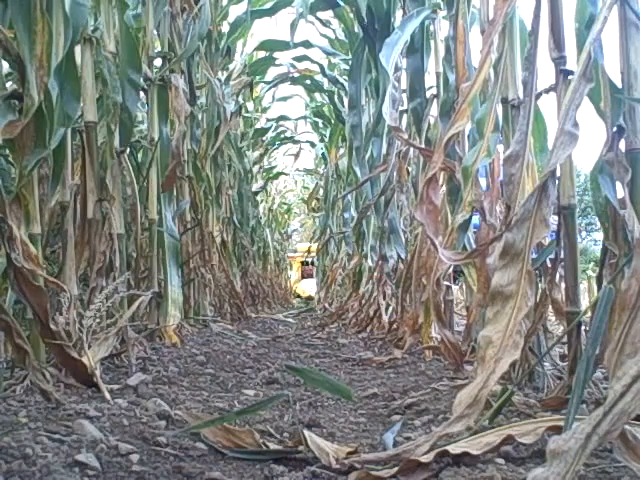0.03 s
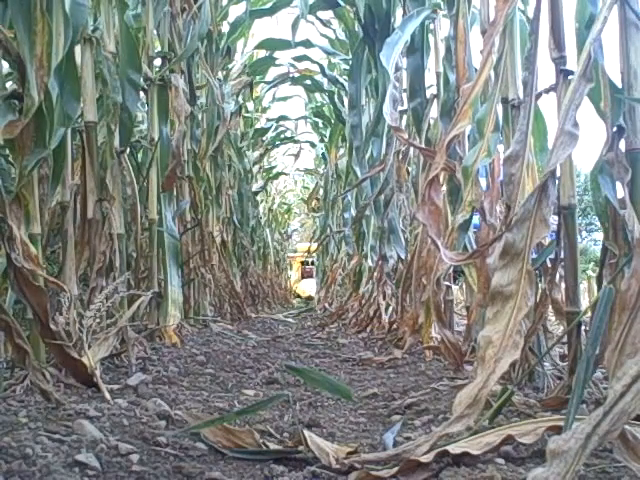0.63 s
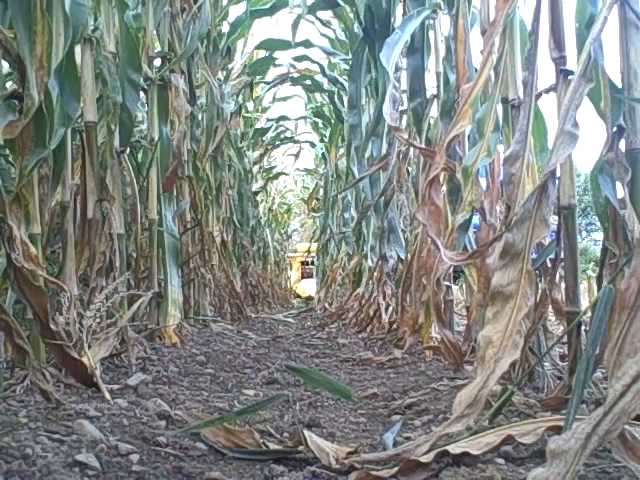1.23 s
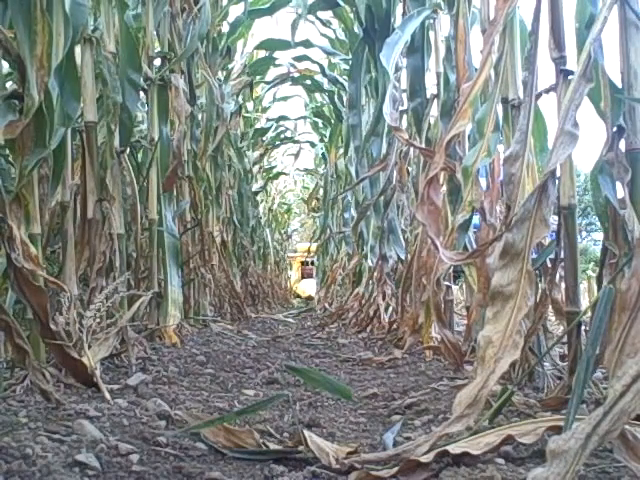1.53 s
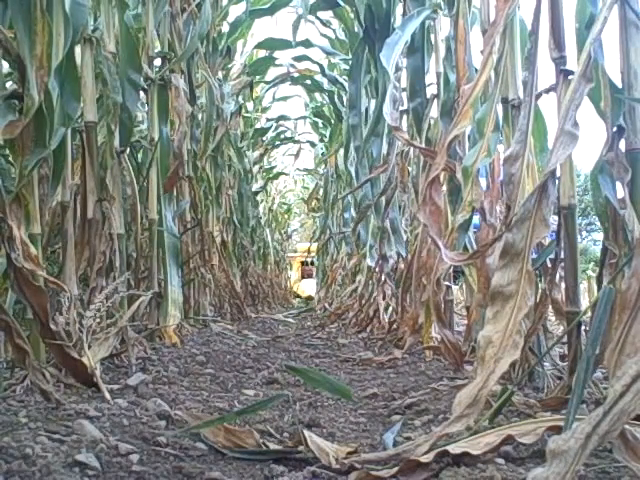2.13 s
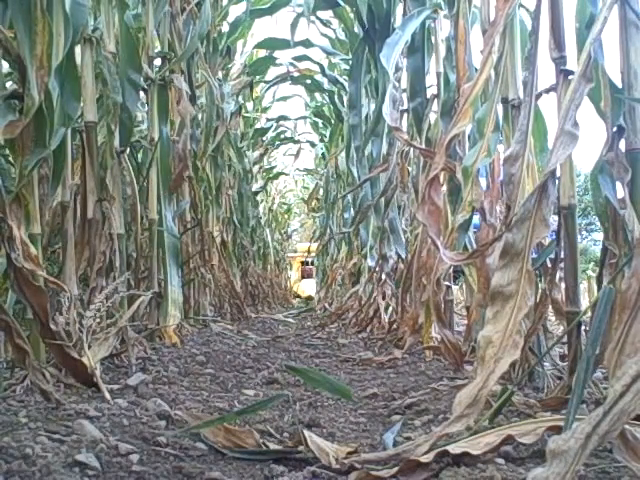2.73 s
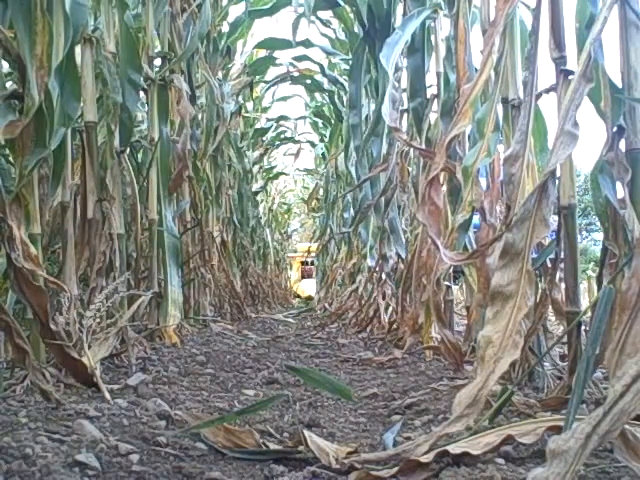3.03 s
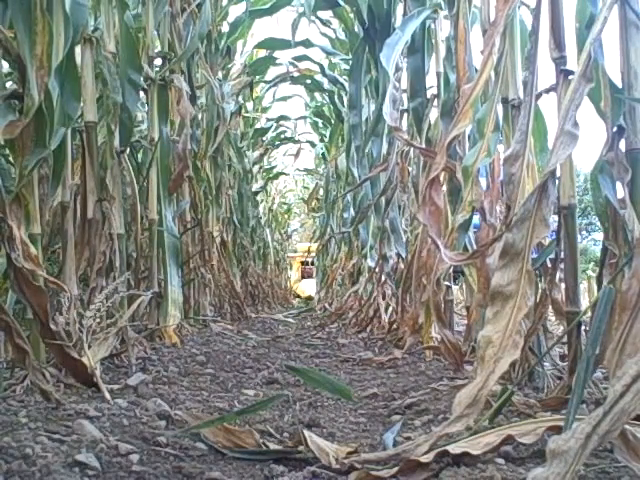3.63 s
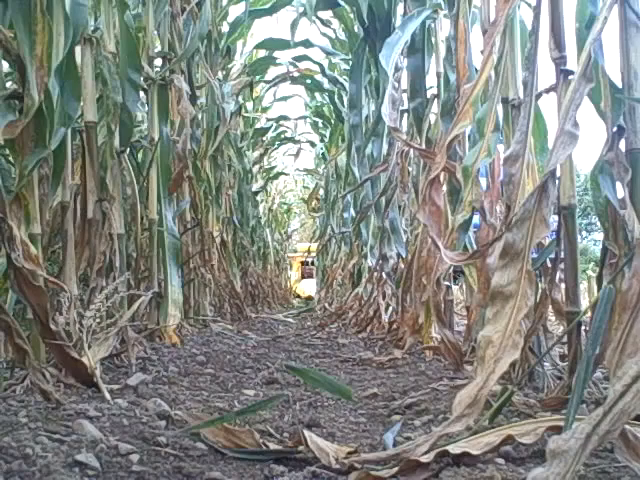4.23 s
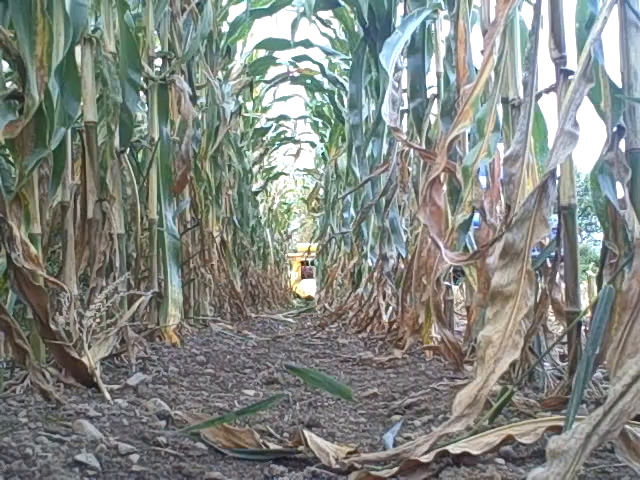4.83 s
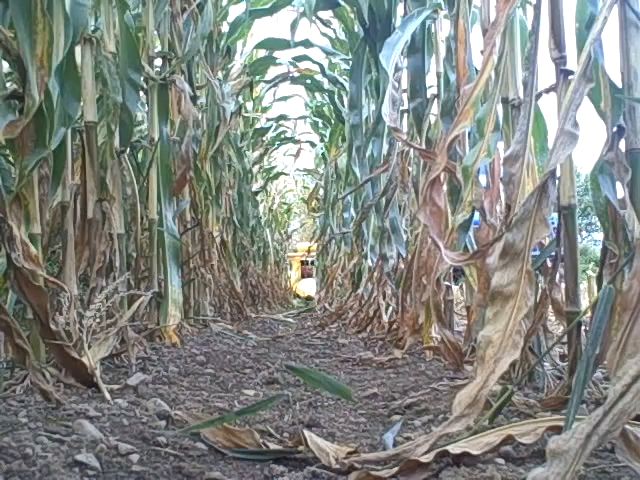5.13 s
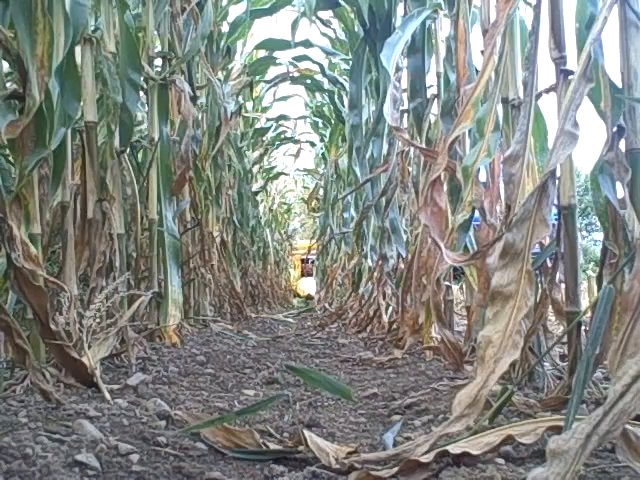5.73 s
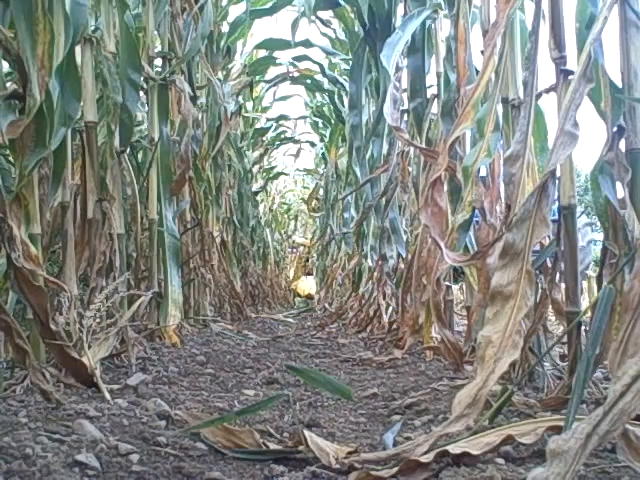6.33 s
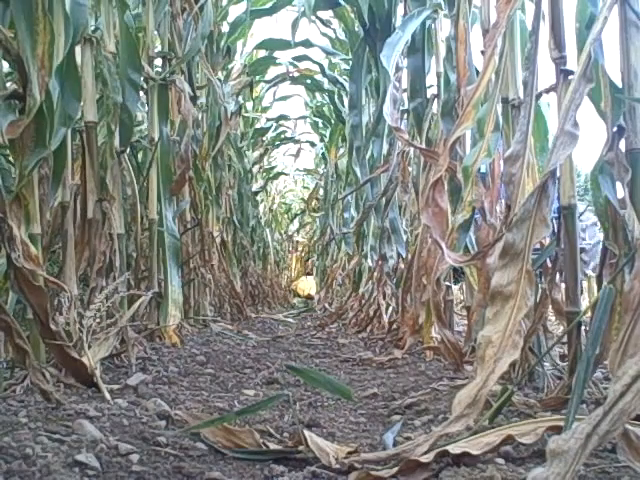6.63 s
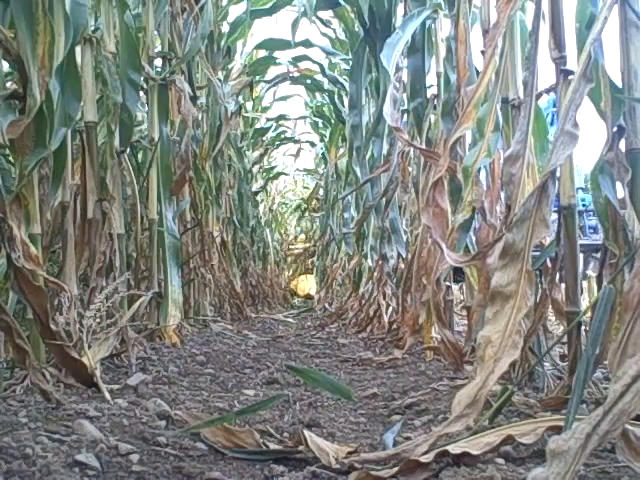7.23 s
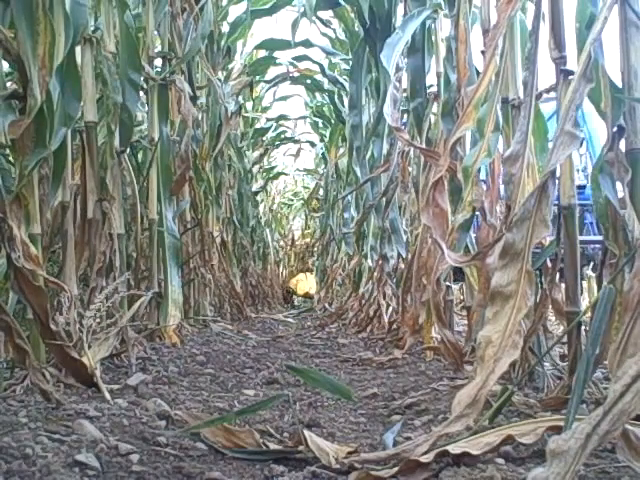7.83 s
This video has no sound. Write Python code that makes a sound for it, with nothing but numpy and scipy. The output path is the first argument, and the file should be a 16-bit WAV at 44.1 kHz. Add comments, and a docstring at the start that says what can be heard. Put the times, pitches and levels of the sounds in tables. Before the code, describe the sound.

A forage chopper and a tractor work through tall corn, heard from one fixed spot in the row. The diesel drones over a low rumble, with rapid metallic clanking, shifting gear whines and a fast, fluttering hiss of chopped stalks. The engine dips briefly, then sags deeper and growls under load. The machines close in and draw level at the end, brushing nearby leaves.

```python
"""A forage chopper's six-cylinder diesel drones under load, working down a row of tall corn with a
tractor alongside, heard from one microphone standing in the row. Each firing pulses the exhaust and
knocks the block, and a clank beats once a cycle; the cutter throws chopped stalks in hissing bursts,
twice a turn. The engine sags briefly near 3 s, then sags deeper and growls around 5 s. The machines
close in and draw level with the microphone at the end, brushing the nearest leaves."""
import sys
import numpy as np
from scipy import signal
from scipy.fft import rfft, irfft, next_fast_len
from scipy.io import wavfile
from scipy.ndimage import uniform_filter1d, map_coordinates

SR = 44100
rng = np.random.default_rng(int(sys.argv[2]) if len(sys.argv) > 2 else 0)


def to_wav(sig):
    """Store sig (one row per channel, or 1-D mono) as 16-bit WAV at the path in sys.argv[1].

    Samples outside -1..1 are clipped; the rate is SR.
    """
    pcm = np.clip(np.atleast_2d(sig), -1, 1) * 32767
    pcm = np.round(pcm).astype(np.int16)
    wavfile.write(sys.argv[1], SR, pcm.T)  # frames by channels


N = 347067
TIME_S = np.arange(N) / SR
APPROACH_S, APPROACH_LENGTH_S = 4.6, 2.1  # the machines close in on the microphone
ABREAST_S, ABREAST_LENGTH_S = 7.15, 0.74  # then swell quickly as they draw level
UNLOADED_FIRING_HZ = 99.4  # sag is how far the firing rate falls below this

# engine speed: t/s, firing rate/Hz
ENGINE_SPEED = [(0, 98.55), (.5, 98.95), (1.3, 98.65), (1.75, 98.45), (2.6, 98.5), (2.82, 96.35),
                (3.08, 97.35), (3.22, 96.85), (3.45, 98.25), (4.1, 98.15), (4.5, 97.6), (5.1, 95.2),
                (5.5, 94.95), (5.8, 95.75), (6.35, 96.2), (6.62, 96.85), (7.87, 96.65)]
# crop flow, as the level of its hiss: t/s, level/dB
CROP_FLOW = [(0.0, -35.5), (1.89, -36.5), (2.52, -38), (5.19, -38.5), (7.43, -36), (7.8, -34.5)]
# each part at the microphone: gain far off and unloaded/dB, change with sag/(dB per Hz),
# change on the approach/dB, change on drawing level/dB
PART_GAINS = { "drone": (-23.5, 0.72, 2, -0.5), "growl": (-13.5, 2, 3.5, -1),
              "frame": (-35.5, -0.98, -0.5, 4), "rumble": (-35, 0.04, 0, 4),
              "block": (-39.5, 0.8, 2.2, 3.5), "injectors": (-38, 0.1, 0.5, 2.5), "howl": (0.5, -3, -5, -4),
              "rush": (-36, -0.45, 1.5, 4), }

# noise spectra, all as f/Hz, relative level/dB
RUMBLE_SPECTRUM = [(20, -34), (35, -10), (50, -14), (70, -2.5), (130, -4.5), (190, -1), (260, -3),
                   (400, -6), (700, -11.5), (1500, -11), (3000, -26.5), (6000, -48)]  # both machines
RUSH_SPECTRUM = [(2800, -2), (3100, -3), (4200, -5.5), (4900, -2.5), (5900, -2), (7000, -3), (8500, -2),
                 (10200, -5.5), (12500, -7.5), (13100, -6), (13700, -8), (15700, -13)]  # steady high rush
LEAF_SPECTRUM = [(4500, -12), (6300, 0), (7600, -1), (10000, -9)]  # brushed leaves
CHOP_SPECTRUM = [(3000, -15), (5000, -8), (6000, 2), (7500, 0), (8500, 5), (9300, 3), (10500, 3),
                 (12500, 2), (13800, 2.5), (15700, -7)]  # flying pieces of stalk
SPOUT_SPECTRUM = [(4300, -26), (4480, -5), (4560, 4), (4800, -25)]  # thin metallic ring of the spout
FRAME_SPECTRUM = [(250, 9.5), (340, -7), (430, 5), (500, -1), (570, -3), (660, 4.5), (760, 1), (900, 0.5),
                  (1050, 3), (1300, -2)]  # low clatter of the frame
BLOCK_SPECTRUM = [(800, -0.5), (1000, -3), (1120, 4), (1220, -4), (1350, 6.5), (1430, 5), (1530, 4),
                  (1680, 2), (1850, -2), (2100, 3)]  # ring of the engine block
INJECTOR_SPECTRUM = [(1600, -9), (1900, 3), (2150, -12), (2310, 4.5), (2430, -5.5), (2620, 3), (2800, -4),
                     (3200, -9.5), (4500, -14.5)]  # bright tick of the injectors
# hiss of coarse to fine pieces: low f/Hz, high f/Hz
PIECE_BANDS = [(3000, 7000), (7000, 10500), (10500, 16000)]

# engine tones, all as order (multiple of the cycle rate), level/dB before any gain
HUM_ORDERS = [(3, -48.5), (4, -53), (5, -73), (7, -47), (8, -50.5), (9, -54), (10, -43.5), (10.41, -40.5),
              (12, -34.5), (14, -41.5), (15, -50.5), (16, -46), (18, -50.5), (20, -49), (20.82, -47),
              (21, -47.5), (22, -50), (30, -78), (31.23, -64)]  # exhaust and drive; fractional orders are geared shafts
EXHAUST_GROWL_ORDERS = [(14, -46), (18, -39), (24, -52), (30, -46), (38, -50), (39, -50), (40, -45.5),
                        (41, -52)]  # labouring exhaust
BLOCK_HOWL_ORDERS = [(30, -49), (31.23, -50), (39, -50), (42, -49), (44, -49), (54, -50), (141, -49),
                     (154, -53), (160, -51)]  # howl of the block
# gear whines: start t/s, end t/s, order, relative level/dB
GEAR_WHINES = [(-.2, 2.7, 66, -49), (-.2, 2.7, 82, -47), (-.2, 2.7, 93, -46), (2.6, 8.1, 84, -48),
               (3.0, 4.7, 72, -45), (3.3, 4.6, 90, -46), (4.2, 4.85, 160, -48), (4.3, 5.0, 108, -49),
               (4.6, 4.95, 110.6, -47), (4.95, 6.2, 72, -45), (4.95, 6.2, 70, -46), (6.1, 7.5, 66, -46),
               (6.3, 8.1, 93, -47), (6.5, 7.8, 72, -48), (6.5, 7.8, 70, -48), (6.5, 8.1, 108, -46),
               (6.55, 7.6, 110.6, -46), (6.6, 8.1, 144, -49), (6.6, 7.7, 153, -49), (7.5, 8.1, 31.23, -41)]
# knock of each cylinder in firing order: relative level/dB
CYLINDER_KNOCKS = [-12.5, -26, -14.5, -36, -8, -9]
# one heavy clank among lighter ones: place/cycle, start f/Hz, end f/Hz, length/s, relative level/dB
CLANK_PATTERN = [(.07, 1720, 1400, .007, -7), (.09, 2650, 2300, .008, -7), (.115, 1310, 1060, .014, 0),
                 (.22, 2000, 1650, .009, -11), (.31, 1060, 720, .013, -6), (.44, 1350, 1200, .007, -2.5),
                 (.45, 2400, 1900, .013, -9), (.5, 2740, 2520, .008, -6), (.56, 1170, 1080, .009, -8),
                 (.68, 1650, 1430, .015, -7), (.69, 2720, 2300, .015, -9), (.76, 1160, 1260, .008, -9),
                 (.91, 1150, 950, .009, -7.5)]
# the clanking, dipping where the engine labours: t/s, level/dB
CLANK_LEVEL = [(0, -28.5), (1.0, -29.5), (1.5, -27.5), (2.6, -27), (2.85, -34), (3.2, -31), (3.5, -27),
               (4.3, -27), (4.7, -32), (5.0, -42), (6.3, -41), (6.7, -35), (7.87, -35)]


def from_db(db):
    """Decibels to amplitude."""
    return 10 ** (np.asarray(db) / 20)


def rms_one(x):
    """Scale a sound to rms 1."""
    return x / np.sqrt(np.mean(x ** 2) + 1e-20)


def curve(rows):
    """A (t/s, value) table at every sample."""
    return np.interp(TIME_S, *np.transpose(rows))


def ramp(start_s, length_s):
    """A straight rise from 0 to 1, then held."""
    return np.clip((TIME_S - start_s) / length_s, 0, 1)


def drift(rate_hz):
    """Smooth random wander of rms 1, mostly slower than rate_hz."""
    hop, settle = 100, 2000
    pole = np.exp(-2 * np.pi * hop * rate_hz / SR)
    noise = rng.standard_normal(N // hop + settle + 2)
    slow = signal.lfilter([1], [1, -2 * pole, pole * pole], noise)[settle:]
    return np.interp(np.arange(N) / hop, np.arange(len(slow)), rms_one(slow))


def tail(x, decay_s):
    """Give each impulse an exponential decay."""
    return signal.lfilter([1], [1, -np.exp(-1 / (decay_s * SR))], x + 1e-18)


def colour(x, spectrum):
    """Shape a sound by a spectrum that falls away steeply past its ends; rms 1."""
    size = next_fast_len(N)
    log_hz = np.log(np.maximum(np.arange(size // 2 + 1) * SR / size, 1))
    hz, level_db = np.transpose(spectrum)
    outside = np.abs(log_hz - np.clip(log_hz, np.log(hz[0]), np.log(hz[-1])))
    gain = from_db(np.interp(log_hz, np.log(hz), level_db) - 40 * outside)
    return rms_one(irfft(rfft(x, size) * gain, size)[:N])


def tones(cycles, orders, waver_db, wander_turns):
    """Wavering engine orders; the lower ones come later, so each cycle sweeps downward."""
    out = np.zeros(N)
    for order, level_db in orders:
        sweep_turns = .009 * order ** 2
        turns = order * cycles + sweep_turns + wander_turns * drift(1)
        out += from_db(level_db + waver_db * drift(0.67)) * np.sin(2 * np.pi * turns)
    return np.sqrt(2) * out


def mic_gain(part, sag_hz):
    """Gain of a part at the microphone, from engine sag and the distance of the machines."""
    far_db, db_per_hz, approach_db, abreast_db = PART_GAINS[part]
    near_db = approach_db * ramp(APPROACH_S, APPROACH_LENGTH_S)
    near_db += abreast_db * ramp(ABREAST_S, ABREAST_LENGTH_S)
    return from_db(far_db + db_per_hz * sag_hz + near_db)


def rumble(sag_hz):
    """Chopper and tractor lay a low bed of noise under everything."""
    return mic_gain("rumble", sag_hz) * colour(rng.standard_normal(N), RUMBLE_SPECTRUM)


def rush(sag_hz, flow_db):
    """A steady high rush follows about a fifth of the crop flow's swing in dB."""
    swing = from_db(0.21 * (flow_db - flow_db.mean()))
    return mic_gain("rush", sag_hz) * swing * colour(rng.standard_normal(N), RUSH_SPECTRUM)


def leaves():
    """A fluttering swish rises as the machines brush the plants nearest the microphone."""
    swell = ramp(ABREAST_S, ABREAST_LENGTH_S) ** 2
    return swell * from_db(-42 + 2.5 * drift(40)) * colour(rng.standard_normal(N), LEAF_SPECTRUM)


def stalks(flow_db, per_s=220):
    """Stray pieces patter against the spout at random."""
    ticks = (rng.random(N) < per_s / SR) * from_db(rng.random(N))
    patter = uniform_filter1d(tail(ticks, decay_s=.00058), size=60)
    return from_db(flow_db - 6.5) * colour(patter * rng.standard_normal(N), CHOP_SPECTRUM)


def cutter(cycles, flow_db, chops_per_cycle=2.63, scatter_s=.0017, uneven_db=3.4, weak_db=-7):
    """Two sprays of stalk a turn, one strong and one weak, uneven in size and timing."""
    chops = cycles * chops_per_cycle
    number = np.arange(int(chops[-1]))
    lateness, size = rng.standard_normal((len(number), 2)).T
    due = np.interp(number + 0.596, chops, np.arange(N))  # a spray leaves partway between chops
    at = np.clip((due + scatter_s * SR * lateness).astype(int), 0, N - 1)
    throws = np.zeros(N)
    throws[at] = from_db(uneven_db * np.tanh(size) + weak_db * (number % 2))
    bursts = tail(tail(throws, .001), .0045)  # quick rise, slower fall
    pieces = np.zeros(N)
    for band in PIECE_BANDS:  # changing shares of coarse and fine colour each spray
        bandpass = signal.butter(2, band, "band", fs=SR, output="sos")
        share = from_db(4 * np.tanh(drift(90)))
        pieces += share * signal.sosfilt(bandpass, rng.standard_normal(N))
    return from_db(flow_db - 3) * colour(bursts * pieces, CHOP_SPECTRUM)


def howl(cycles, sag_hz):
    """The block howls and the spout rings; both fade under load and as the machines near."""
    block = tones(cycles, BLOCK_HOWL_ORDERS, waver_db=2, wander_turns=.1)
    spout = from_db(-50) * colour(rng.standard_normal(N), SPOUT_SPECTRUM)
    return mic_gain("howl", sag_hz) * (block + spout)


def gears(cycles, fade_s=.15, gain_db=3.3):
    """Gear whines swell, hold and fade, each with its own flutter."""
    out = np.zeros(N)
    for start_s, end_s, order, level_db in GEAR_WHINES:
        swell = np.clip(.5 + np.minimum(TIME_S - start_s, end_s - TIME_S) / fade_s, 0, 1)
        flutter = from_db(1.8 * drift(30))
        out += swell * flutter * tones(cycles, [(order, level_db)], waver_db=.7, wander_turns=.08)
    return from_db(gain_db) * out


def clanks(cycles, cycle_hz, rough_db=.7, jitter_s=12e-6):
    """Short, rough metallic clanks come round every cycle, each a quick glide."""
    out = np.zeros(N)
    for place, start_hz, end_hz, length_s, level_db in CLANK_PATTERN:
        age_s = (cycles - place) % 1 / cycle_hz + jitter_s * drift(23)
        progress = np.clip(age_s / length_s, 0, 1)
        turns = age_s * (start_hz + .5 * (end_hz - start_hz) * progress)
        swell = np.sin(np.pi * np.sqrt(progress))
        out += from_db(level_db + rough_db * drift(78)) * swell * np.sin(2 * np.pi * turns)
    return np.sqrt(2) * from_db(curve(CLANK_LEVEL)) * out


def rattle(cycles, change_s, size=4096):
    """A rattle repeats every cycle; its pattern turns over as the path through the corn changes."""
    patterns = irfft(np.exp(2j * np.pi * rng.random((64, size // 2 + 1))))
    stage = TIME_S / change_s
    row, blend = stage.astype(int), stage % 1 * np.pi / 2
    place = cycles % 1 * size
    before = map_coordinates(patterns, [row, place], order=1, mode="grid-wrap")
    after = map_coordinates(patterns, [row + 1, place], order=1, mode="grid-wrap")
    return rms_one(before * np.cos(blend) + after * np.sin(blend))


def knocks(cycles, spectrum, loose, decay_gaps, sustain, change_s):
    """Six unequal knocks a cycle ring one part, each dying down within a share of the firing gap."""
    firings = cycles * len(CYLINDER_KNOCKS)
    strength = from_db(CYLINDER_KNOCKS)[firings.astype(int) % len(CYLINDER_KNOCKS)]
    blows = sustain + strength * np.exp(-(firings % 1) / decay_gaps)
    grain = rattle(cycles, change_s) + loose * rng.standard_normal(N)
    ring = colour(blows * grain, spectrum)
    return ring / np.sqrt(uniform_filter1d(ring * ring, SR // 4) + 1e-12)  # even over a few cycles


def clatter(cycles, sag_hz):
    """The firings knock the frame, the block and the injectors."""
    frame = knocks(cycles, FRAME_SPECTRUM, loose=.43, decay_gaps=.14, sustain=.28, change_s=2.49)
    block = knocks(cycles, BLOCK_SPECTRUM, loose=.45, decay_gaps=.38, sustain=1, change_s=2.41)
    injectors = knocks(cycles, INJECTOR_SPECTRUM, loose=.55, decay_gaps=.41, sustain=.7, change_s=2.17)
    return (mic_gain("frame", sag_hz) * frame + mic_gain("block", sag_hz) * block
            + mic_gain("injectors", sag_hz) * injectors)


def exhaust(cycles, sag_hz):
    """A clean drone at the firing rate over weaker orders; under load it swells and growls."""
    pulses = np.sqrt(2) * np.sin(2 * np.pi * len(CYLINDER_KNOCKS) * cycles)
    drone = from_db(.28 * drift(11)) * pulses
    flutter = from_db(1.5 * drift(15))
    growl = flutter * tones(cycles, EXHAUST_GROWL_ORDERS, waver_db=-.5, wander_turns=.15)
    hum = tones(cycles, HUM_ORDERS, waver_db=.5, wander_turns=.17)
    return mic_gain("drone", sag_hz) * drone + mic_gain("growl", sag_hz) * growl + hum


def scene():
    """The diesel and the flying crop over the bed of both machines, in mono from one spot in the row."""
    firing_hz, flow_db = curve(ENGINE_SPEED), curve(CROP_FLOW)
    sag_hz = UNLOADED_FIRING_HZ - firing_hz
    cycle_hz = firing_hz / len(CYLINDER_KNOCKS)
    cycles = np.cumsum(cycle_hz) / SR
    engine = clanks(cycles, cycle_hz) + exhaust(cycles, sag_hz) + clatter(cycles, sag_hz)
    whine = howl(cycles, sag_hz) + gears(cycles)
    bed = rumble(sag_hz) + rush(sag_hz, flow_db)
    crop = cutter(cycles, flow_db) + stalks(flow_db) + leaves()
    return (bed + crop + whine + engine)[None]


def record(dry):
    """The microphone's top end is cut steeply above 15.75 kHz."""
    return signal.sosfilt(signal.ellip(12, .2, 90, 15750, fs=SR, output="sos"), dry)


dry = scene()
out = record(dry)
to_wav(out)
```